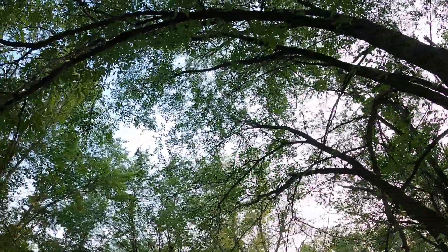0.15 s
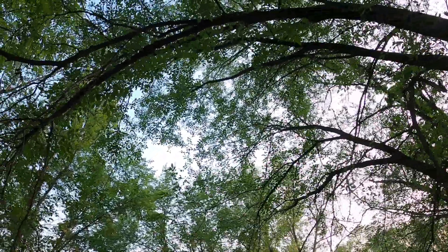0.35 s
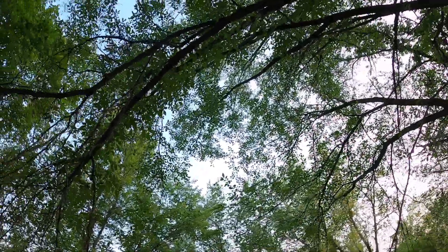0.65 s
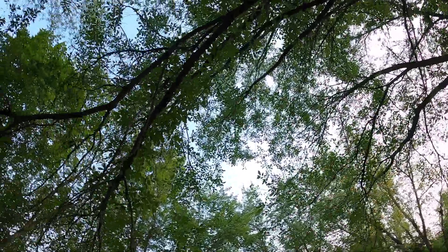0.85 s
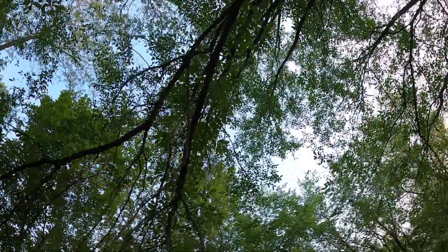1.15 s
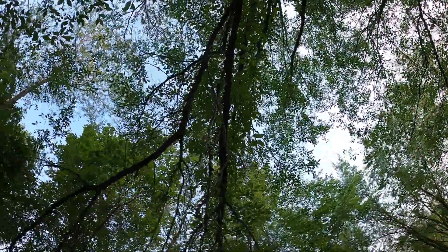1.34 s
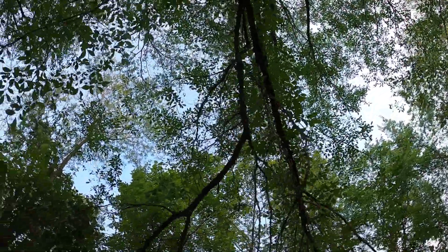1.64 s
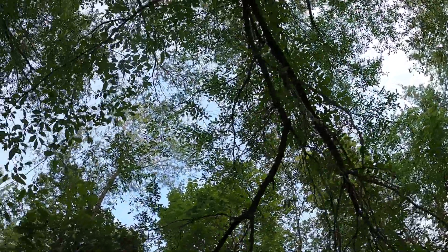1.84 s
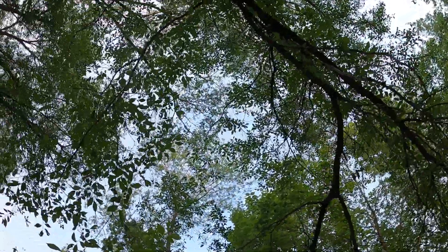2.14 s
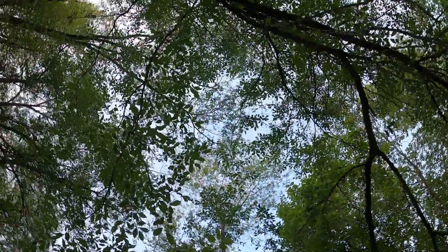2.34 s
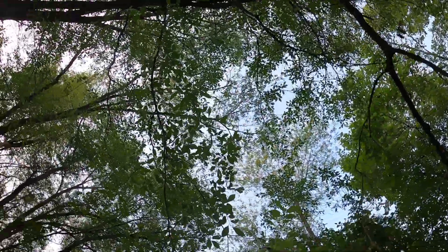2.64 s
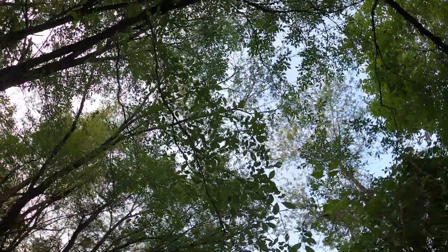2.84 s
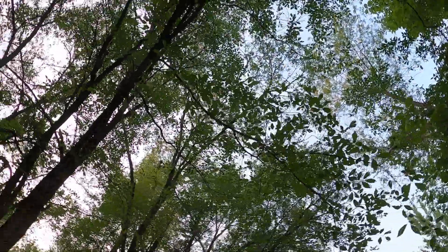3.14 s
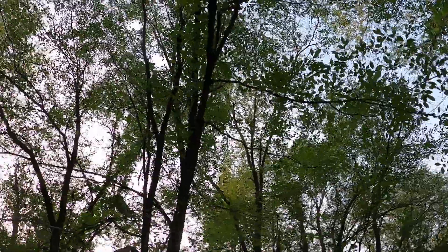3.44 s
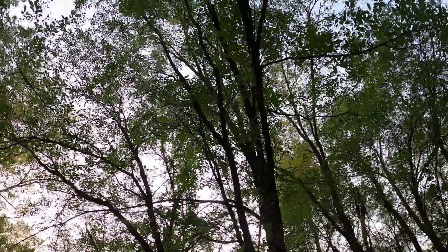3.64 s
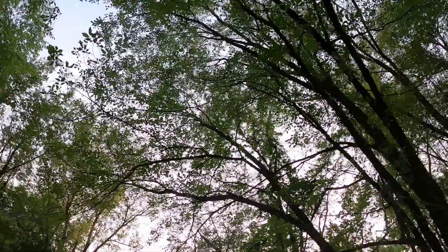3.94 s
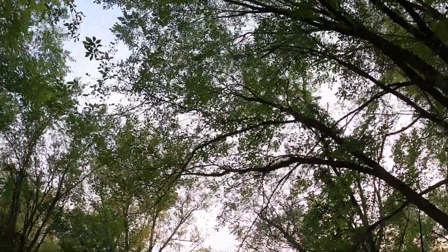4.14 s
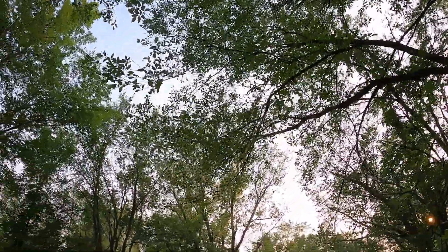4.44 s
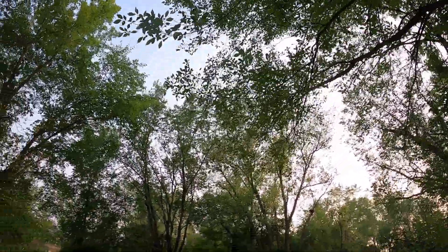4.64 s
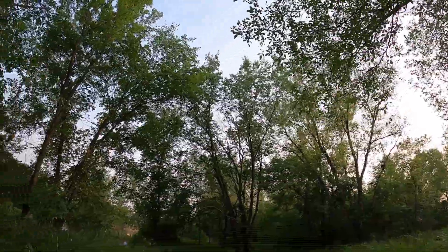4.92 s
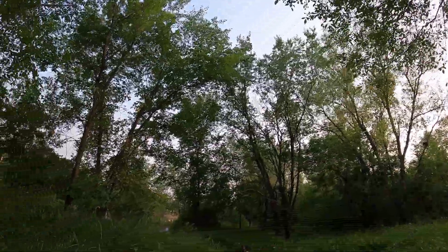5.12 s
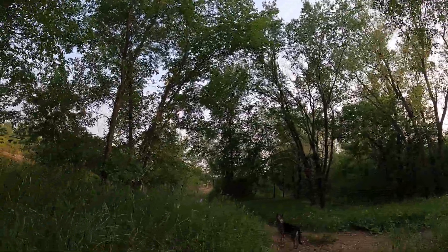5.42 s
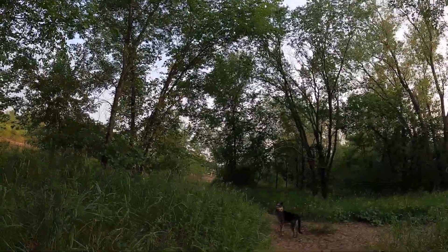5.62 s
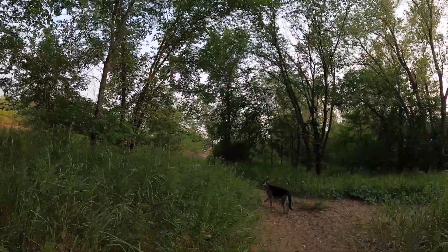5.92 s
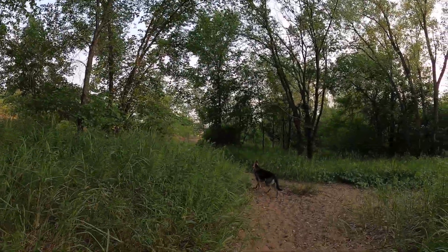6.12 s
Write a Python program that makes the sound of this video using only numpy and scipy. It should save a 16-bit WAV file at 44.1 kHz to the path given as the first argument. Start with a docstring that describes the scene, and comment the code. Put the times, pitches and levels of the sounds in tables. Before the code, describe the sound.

Cicadas shrill steadily over a distant road's rumble and growing engine hum, with clothing swishes, faint litter ticks and two early bird chips.

```python
"""Cicadas shrill from the treetops over the rumble of a distant road and a faint engine hum.
Someone turning slowly rustles and swishes clothing, and dry litter ticks underfoot.
Air buffets the microphone; a small bird chips twice and another twitters far off.
Cicadas are click-driven decaying rings; road, air, cloth and litter are shaped noise;
engine and birds are sines; singing tyres are narrow fluttering bands."""
import sys
import numpy as np
from scipy import signal
from scipy.fft import rfft, irfft
from scipy.io import wavfile
from scipy.ndimage import uniform_filter1d

SR = 44100
rng = np.random.default_rng(int(sys.argv[2]) if len(sys.argv) > 2 else 0)


def wav_record(signal):
    """Record a signal, one row per channel, as 16-bit PCM in the file named by sys.argv[1]."""
    frames = np.transpose(np.atleast_2d(signal))
    bounded = np.clip(frames, -1, 1)
    # unit amplitude maps onto the largest positive 16-bit level
    quanta = np.round(bounded * 32767).astype(np.int16)
    wavfile.write(sys.argv[1], SR, quanta)


N = 276507
TIME = np.arange(N) / SR
FREQ = np.maximum(np.arange(N // 2 + 1) * SR / N, 1)

# Spectrum levels are relative. Bump lengths are 1/e half-widths.
# Distant road spectrum: (frequency [Hz], level [dB])
ROAD_HZ_DB = [(160, 0), (280, -9), (309, -16.5), (382, -2.5), (409, -6.5), (467, -7), (528, -1.5),
              (571, -4.5), (729, -4), (1030, 1), (1260, -3), (2510, -17), (2930, -25), (3500, -29),
              (4000, -37), (5200, -71), (8800, -120)]
# Road over time: (time [s], roar level before flutter [dB], gain of the part below about 800 Hz [dB])
ROAD_S_DB_DB = [(0, -43.5, 2), (.6, -43, 2.8), (1.2, -45, 4.5), (2.2, -45.5, 3), (3.5, -46, 2.5),
                (4.5, -46, 3), (5.4, -44.5, -2), (6.27, -45, -3.5)]
# Tyres singing on the road: (centre [s], length [s], frequency [Hz], level [dB])
WHINE_S_S_HZ_DB = [(3, 4, 531, -60.5), (.1, .3, 535, -57), (1.5, .28, 533, -54.5), (3.12, .1, 526, -56),
                   (3.72, .24, 529, -56), (4.7, .33, 526, -57.5), (2.2, 2.6, 965, -60),
                   (.68, .08, 940, -54.5), (2.75, .3, 945, -56.5), (3.7, .2, 940, -56.5),
                   (5.9, .18, 955, -56), (3, 4, 1055, -61), (.55, .22, 1075, -57.5), (2.3, .2, 1065, -56.5),
                   (4.33, .25, 1045, -53), (5.05, .12, 1050, -56.5), (5.87, .1, 1055, -53),
                   (6.24, .13, 1040, -52.5)]
WHINE_HALF_WIDTH_HZ = 17.3
# Low rumble spectrum: (frequency [Hz], level [dB])
RUMBLE_HZ_DB = [(11, -51), (18, 5), (37, 1.5), (78, -5), (103, -11.5), (150, -16), (330, -31.5), (430, -54),
                (730, -120)]
# Gain of the upper rumble: (time [s], gain [dB])
UPPER_S_DB = [(0, -30), (1.3, -29), (2, -32), (2.9, -31.5), (3.5, -29), (4.7, -28.5), (5.3, -32),
              (6.27, -30.5)]
# Surges of the deep rumble: (centre [s], length [s], added gain [dB])
SURGES_S_S_DB = [(.55, 0.14, -40), (1.15, 0.17, -34.5), (1.6, 0.032, -25), (2.07, 0.055, -35),
                 (3.5, 0.25, -31.5), (4.58, 0.3, -37.5)]
DEEP_DB = -31.5
# Far engine drawing nearer: (time [s], level [dB])
ENGINE_S_DB = [(0, -53), (2.5, -48), (3.5, -42.4), (4.6, -41.4), (4.95, -37.4), (6.27, -35.2)]
ENGINE_FIRING_HZ = 74.35
# Puffs of air on the microphone: (centre [s], length [s], level before port gains [dB])
PUFFS_S_S_DB = [(.28, 0.033, -40), (3.625, 0.12, -31.5), (3.966, 0.029, -40), (4.03, 0.058, -26),
                (4.78, 0.031, -38)]
# Bouts of far twitter: (centre [s], length [s], pitch [Hz], level before canopy and ear gains [dB])
TWITTER_S_S_HZ_DB = [(1.8, .06, 4770, -61), (2.08, .03, 4760, -64), (2.255, .04, 4880, -57),
                     (2.3, .05, 4470, -56), (2.55, .1, 4780, -68), (2.742, 0.082, 4480, -58),
                     (2.85, .07, 4890, -57), (3.16, 0.065, 4440, -55), (3.37, 0.083, 4890, -54.5),
                     (3.938, 0.054, 4510, -57), (4.72, 0.07, 4820, -57)]
# Bird chips: (start [s], length [s], start pitch [Hz], end pitch [Hz], peak before ear gains [dB])
CHIPS_S_S_HZ_HZ_DB = [(0.054, .031, 4570, 4170, -45.5), (0.098, 0.032, 4640, 4170, -46.5)]
CHIP_ARCH, CHIP_ECHO_DB, CHIP_ECHO_S = 1.9, -11, .02
# Rubbing cloth spectrum: (frequency [Hz], level [dB])
CLOTH_HZ_DB = [(4710, -23), (8000, 1), (8270, -18), (8670, -1), (9220, -0.5), (10800, -8), (12200, -5.5),
               (13500, -11.5), (15600, -24)]
# Slow rubs, one per body movement: (start [s], length [s], level before sag and flutter [dB])
RUBS_S_S_DB = [(-.07, 1.48, -58), (1.75, 1.17, -70.5), (3.63, 0.9, -70), (3.96, 0.19, -70),
               (4.61, 0.33, -69), (4.88, 0.26, -62), (5.46, 0.17, -61.5), (6.11, .2, -66)]
RUB_ATTACK_S, RUB_SAG_DB_PER_S, RUB_RELEASE_S, CLOTH_REST_DB = 0.04, 6, 0.094, -79.5
# Sleeve swishes: (peak [s], rise 1/e [s], decay [s], swish gain [dB], body relative to swish gain [dB])
SWISHES_S_S_S_DB_DB = [(.003, .012, .023, -44.5, -2), (0.055, 0.0032, .005, -38, -10),
                       (.132, 0.0035, 0.011, -40, 2.5), (.367, .005, .005, -49, 2),
                       (3.859, .014, 0.015, -54, -5), (3.886, 0.006, .015, -50, 0),
                       (4.893, 0.022, 0.053, -48.5, -2.5), (5.24, .025, .03, -63, -4),
                       (5.513, 0.0086, .016, -43, 1.5), (5.537, 0.014, 0.029, -39, -9)]
# Swish body spectrum: (frequency [Hz], level [dB])
SWISH_HZ_DB = [(2500, -7), (3800, -10.5), (4700, 2.5), (6500, 3.5), (8300, -5), (9200, 7.5), (11000, -14),
               (13000, -25), (16000, -15)]
SWISH_HISS_DB = -6  # hiss relative to the swish gain
# Threads catching and letting go: (time [s], peak level [dB])
SNAGS_S_DB = [(.518, -45), (3.829, -54), (4.022, -58), (4.952, -49), (4.964, -46), (5.063, -48),
              (5.102, -56), (5.491, -52), (5.602, -44.5), (5.619, -50)]
SNAG_DECAY_S = 0.00067
# Crunching litter spectrum: (frequency [Hz], level [dB])
LITTER_HZ_DB = [(900, -37), (2000, 3.5), (3200, -2), (4600, 5.5), (6000, 3), (8000, -5), (12000, -13),
                (16000, -43)]
# Shoe turning on dry litter: (start [s], length [s], level before sag [dB])
SCUFFS_S_S_DB = [(-.03, 0.044, -50), (.2, 0.24, -58), (.42, .07, -51), (.7, 0.91, -62), (3.68, 0.48, -63),
                 (4.82, 0.35, -62), (5.5, 0.39, -61.5), (6.18, .1, -66)]
SCUFF_ATTACK_S, SCUFF_SAG_DB_PER_S, SCUFF_RELEASE_S, LITTER_REST_DB = 0.023, 0.5, 0.19, -75
# Twigs and grit: (time [s], snap level [dB], crumbling tail relative to snap [dB],
# tail decay [s], brightness [dB/octave])
TICKS_S_DB_DB_S_DB_PER_OCT = [(0.362, -48, 3, 0.028, -.5), (0.634, -39, -16, .004, -1),
                              (.663, -48, -12, .003, -1), (1.53, -61, -4, .0068, 4),
                              (1.784, -51.5, -1, 0.01, -5), (2.162, -56, -3, .003, 5),
                              (4.106, -45, -2.5, 0.032, -2), (4.922, -53, -5, .005, -6),
                              (5.767, -52.5, 4, 0.031, -14)]
# Ring modes of a dry twig: (frequency [Hz], level before brightness [dB], decay [s])
TWIG_HZ_DB_S = [(2600, -7, 0.0049), (4370, -3, .003), (5880, 6.5, 0.0031)]
SNAP_DECAY_S = 0.0053
# Cicada body resonance: (frequency [Hz], level [dB])
SHRILL_HZ_DB = [(5200, -22.5), (5700, -16.5), (6000, -15.5), (6300, -8), (6550, -.5), (6750, 0.5),
                (7100, -5), (7400, -13), (7700, -23.5), (8000, -35.5)]
# High chorus swell: (time [s], level before flutter [dB])
CHORUS_S_DB = [(0, -49), (2.2, -49.5), (3, -46.5), (4.6, -49), (5.5, -51), (6.27, -50.5)]
# Spectrum of the lower insects: (frequency [Hz], level [dB])
RASP_HZ_DB = [(3800, -12), (4150, -7), (4400, -0.5), (4700, 3.5), (5000, 0), (5250, -25), (5500, -27)]
# Swell of the lower insects: (time [s], level before flutter [dB])
RASP_S_DB = [(0, -62.5), (4.7, -63), (5.4, -67), (6.27, -64)]
# Lean of the stereo image: (frequency [Hz], left minus right [dB])
TILT_HZ_DB = [(30, -.3), (70, -.5), (140, -1), (300, 0), (1000, 0.7), (2500, 3), (4700, 3.5), (6700, 7),
              (7500, 6.5), (8300, 1.9), (9300, 10), (10800, 7), (12300, 10.9), (15000, 11)]
# Likeness of the two channels, capped at 0.99 in use: (frequency [Hz], correlation [0-1])
LIKENESS_HZ_CORR = [(30, 1), (70, 0.99), (130, 1), (280, 0.95), (550, 0.93), (1100, 0.85), (2500, 0.37),
                    (4700, 0.29), (6700, .03), (12000, 0.042)]
TOP_HZ = 15600


def undb(db):
    """Decibels to gain."""
    return 10 ** (np.asarray(db) / 20)


def unit(x):
    """Scale to an rms of one."""
    return x / np.sqrt(np.mean(x ** 2) + 1e-30)


def curve(rows):
    """Gain over time from (time [s], level [dB]) rows."""
    return undb(np.interp(TIME, *np.transpose(rows)))


def across(points):
    """(frequency [Hz], value) points joined on a log-frequency axis."""
    hz, value = np.transpose(points)
    return np.interp(np.log(FREQ), np.log(hz), value)


def colour(x, points):
    """Filter by a (frequency [Hz], level [dB]) spectrum, falling steeply beyond its ends; unit rms."""
    octaves_below = np.maximum(np.log2(points[0][0] / FREQ), 0)
    octaves_above = np.maximum(np.log2(FREQ / points[-1][0]), 0)
    gain = undb(across(points) - 49 * (octaves_below + octaves_above))
    return unit(irfft(rfft(x) * gain, N))


def noise():
    """Two unrelated white noises."""
    return rng.standard_normal((2, N))


def walk(rate_hz):
    """Smooth random wandering with a spread of one."""
    return unit(irfft(rfft(rng.standard_normal(N)) * np.exp(-(FREQ / rate_hz) ** 2), N))


def bump(at_s, length_s):
    """Gaussian swell around one moment."""
    return np.exp(-((TIME - at_s) / length_s) ** 2)


def swells(rows):
    """Summed gain of bumps: (centre [s], length [s], level [dB])."""
    return sum(undb(db) * bump(at, length) for at, length, db in rows)


def strokes(rows, attack_s, sag_db_per_s, release_s, rest_db):
    """Gain of rubbing strokes: attack, sagging hold and release, power-summed over a resting level."""
    power = undb(rest_db) ** 2
    for at, length, db in rows:
        age = np.maximum(TIME - at, 0)
        attack = np.minimum(age / attack_s, 1)
        release = np.exp(-np.maximum(age - length, 0) / release_s)
        power = power + (attack * release * undb(db - sag_db_per_s * age)) ** 2
    return np.sqrt(power)


def even(pair):
    """Level out the broad shape of a spectrum and keep its fine grain."""
    spectrum = rfft(pair)
    power = uniform_filter1d(np.mean(np.abs(spectrum) ** 2, axis=0), size=1200)
    return irfft(spectrum / np.sqrt(np.abs(power) + 1e-6 * power.max()), N)


def ports(pair):
    """Left and right from two unrelated signals: alike in the bass, leaning left in the treble."""
    alike = np.clip(across(LIKENESS_HZ_CORR), -.99, .99)
    mid, side = rfft(pair) * np.sqrt([1 + alike, 1 - alike])
    lean = undb(across(TILT_HZ_DB) / 2)
    out = irfft(np.array([(mid + side) * lean, (mid - side) / lean]), N)
    return out / np.std(out.mean(axis=0))


def scatter_paths(fade_s):
    """Decaying noise responses of leaves and branches, different for each ear."""
    tail = TIME[:SR // 4]
    return unit(rng.standard_normal((2, len(tail))) * np.exp(-tail / fade_s)) / np.sqrt(len(tail))


def canopy(x, fade_s):
    """Leaves and branches scatter a sound into a short tail."""
    return signal.fftconvolve(scatter_paths(fade_s), x[None], axes=1)[:, :N]


def road():
    """Far traffic: a coloured-noise tyre roar that loses its body toward the end."""
    roar = ports(colour(noise(), ROAD_HZ_DB))
    body = irfft(rfft(roar) / (1 + (FREQ / 800) ** 6), N)
    times, roar_db, body_db = np.transpose(ROAD_S_DB_DB)
    weighted = roar + body * (undb(np.interp(TIME, times, body_db)) - 1)
    return weighted * undb(np.interp(TIME, times, roar_db) + 0.79 * walk(5.9))


def whine():
    """Passing tyres sing in narrow, fluttering bands that swell and fade."""
    flutter = walk(WHINE_HALF_WIDTH_HZ) + 1j * walk(WHINE_HALF_WIDTH_HZ)
    out = np.zeros(N)
    for at, length, hz, db in WHINE_S_S_HZ_DB:
        carrier = np.exp(2j * np.pi * hz * TIME)
        band = np.real(np.roll(flutter, rng.integers(N)) * carrier)
        out += undb(db) * bump(at, length) * band
    return out


def rumble():
    """A low noise rumble whose deepest part surges."""
    low = ports(colour(noise(), RUMBLE_HZ_DB))
    deep = irfft(rfft(low) / (1 + (FREQ / 75) ** 4), N)
    return deep * (undb(DEEP_DB) + swells(SURGES_S_S_DB)) + (low - deep) * curve(UPPER_S_DB)


def engine():
    """Firing rate and second harmonic of a far engine, fading in and out on the way through the trees."""
    turn = 2 * np.pi * np.cumsum(ENGINE_FIRING_HZ * (1 + 0.01311 * walk(4.27))) / SR
    fading = undb(3 * walk(9))
    hum = np.sin(turn) + undb(-16.5) * np.sin(2 * turn)
    return unit(hum * fading) * curve(ENGINE_S_DB)


def buffets():
    """Air tumbles over the microphone as low noise, mostly on the right port."""
    eddies = colour(noise(), [(40, -8.5), (90, -2), (160, -4.0), (260, -21.5), (400, -36.0)])
    left = undb(-17) * (eddies[1] + 0.5 * eddies[0])
    right = undb(7.5) * eddies[1]
    return np.array([left, right]) * swells(PUFFS_S_S_DB)


def twitter():
    """A far bird repeats quick falling sine notes, blurred by the trees."""
    out = np.zeros(N)
    for at, length, hz, db in TWITTER_S_S_HZ_DB:
        note = np.cumsum(26 * (1 + 0.18 * walk(22))) / SR % 1  # phase at about 26 notes/s
        pitch_hz = hz * (1 + 0.0867 * (.5 - note) + .022 * walk(122.2))
        whistle = np.sin(2 * np.pi * np.cumsum(pitch_hz) / SR)
        out += undb(db) * bump(at, length) * np.sin(np.pi * note) ** 2 * whistle
    return canopy(out, fade_s=0.03) * undb([[8], [6]])


def bird():
    """Short sine whistles from the right: each starts level, then drops, and the leaves blur it."""
    out = np.zeros(N)
    for at, length, start_hz, end_hz, db in CHIPS_S_S_HZ_HZ_DB:
        part = np.clip((TIME - at) / length, 0, 1)
        hz = start_hz + (end_hz - start_hz) * part ** CHIP_ARCH + 60 * walk(400)
        out += undb(db) * np.sin(np.pi * part) * np.sin(2 * np.pi * np.cumsum(hz) / SR)
    return (out + undb(CHIP_ECHO_DB) * canopy(out, CHIP_ECHO_S)) * undb([[-1], [4]])


def clothing():
    """Threads slip in a grainy hiss; quick arm moves swish and trail off; a few threads snap free."""
    hiss = ports(colour(noise() * undb(2.0 * walk(500)), CLOTH_HZ_DB))
    body = ports(colour(noise() * undb(3.1 * walk(350)), SWISH_HZ_DB))
    rubbing = strokes(RUBS_S_S_DB, RUB_ATTACK_S, RUB_SAG_DB_PER_S, RUB_RELEASE_S, CLOTH_REST_DB)
    rubbing = rubbing * undb(1.4 * walk(22))  # uneven pressure
    swishing, pressing, snags = 0, 0, 0
    for at, rise, decay, db, body_db in SWISHES_S_S_S_DB_DB:
        fall = np.exp(-np.abs(TIME - at) / decay)
        swish = undb(db) * np.where(TIME < at, bump(at, rise), fall)
        swishing = swishing + swish
        pressing = pressing + undb(body_db) * swish
    for at, db in SNAGS_S_DB:
        fall = np.exp(-np.clip((TIME - at) / SNAG_DECAY_S, 0, 20))
        snags = snags + undb(db) * (TIME >= at) * fall
    return hiss * (np.hypot(rubbing, undb(SWISH_HISS_DB) * swishing) + snags) + body * pressing


def scuffing():
    """Dry litter crunches as grainy noise under a turning shoe."""
    crunch = ports(colour(noise() * undb(1.9 * walk(690)), LITTER_HZ_DB))
    return crunch * strokes(SCUFFS_S_S_DB, SCUFF_ATTACK_S, SCUFF_SAG_DB_PER_S,
                            SCUFF_RELEASE_S, LITTER_REST_DB)


def twigs():
    """Twigs snap as noise, ring briefly in a few modes and crumble."""
    out = np.zeros((2, N))
    crumbs = unit(undb(2.2 * walk(300)))
    grit = rfft(ports(colour(noise(), LITTER_HZ_DB)))
    pivot_hz = TWIG_HZ_DB_S[0][0]
    for at, db, tail_db, decay, bright in TICKS_S_DB_DB_S_DB_PER_OCT:
        age = np.clip(TIME - at, 0, 20 * decay)
        tail = undb(tail_db) * crumbs * np.exp(-age / decay)
        shape = np.hypot(np.exp(-age / SNAP_DECAY_S), tail)
        crack = irfft(grit * undb(bright * np.log2(FREQ / pivot_hz)), N)
        crack = shape * crack / np.std(crack.mean(axis=0))
        size = 1 + 0.013 * rng.standard_normal()  # scales every mode
        ring = 0
        for hz, mode_db, fade in TWIG_HZ_DB_S:
            gain = undb(mode_db + bright * np.log2(hz / pivot_hz))
            ring = ring + gain * np.sin(2 * np.pi * hz * size * age) * np.exp(-age / fade)
        out += (crack + ring) * undb(db) * (TIME >= at)
    return out


def singers(ring_hz, click_hz, beat_hz, glide, spread, throb_db, canopy_s, count):
    """Each insect clicks its tymbals in beats; the ring sinks through a beat and leaves scatter it."""
    out = np.zeros((2, N))
    for _ in range(count):
        pace, pitch, size = rng.standard_normal(3)
        beat = np.cumsum(beat_hz * (1 + .05 * pace + .04 * walk(5))) / SR % 1
        rate_hz = click_hz * (1 + .1 * pace + .05 * walk(60))
        age = np.cumsum(rate_hz) / SR % 1 / rate_hz  # time since the last click
        hz = ring_hz * (1 + spread * pitch + glide * (.5 - beat))
        ring = np.sin(2 * np.pi * hz * age) * np.exp(-age / 0.0023)
        song = ring * undb(throb_db * np.cos(2 * np.pi * beat) + 2 * size + walk(2.3))
        paths = scatter_paths(canopy_s)
        paths[[0, 1], rng.integers(0, 24, size=2)] += 1.2  # the direct sound
        out += signal.fftconvolve(paths, song[None], axes=1)[:, :N]
    return out


def cicadas():
    """A high chorus that flutters as it reaches the ear, and a weaker, lower one."""
    high = singers(ring_hz=6743, click_hz=424.0, beat_hz=39.94, glide=0.091, spread=0.0423,
                   throb_db=4.5, canopy_s=0.054, count=6)
    low = singers(ring_hz=4615, click_hz=248.9, beat_hz=28.56, glide=0.046, spread=0.0735,
                  throb_db=4.5, canopy_s=0.078, count=4)
    high = ports(colour(even(high), SHRILL_HZ_DB)) * curve(CHORUS_S_DB) * undb(0.7 * walk(30))
    low = ports(colour(even(low), RASP_HZ_DB)) * curve(RASP_S_DB) * undb(2.2 * walk(4.2))
    return high + low


def scene():
    """Everything heard under the trees."""
    background = road() + whine() + rumble() + engine() + buffets()
    near = clothing() + scuffing() + twigs()
    return background + twitter() + bird() + near + cicadas()


def record(dry):
    """Fade 3 ms in and out, then cut the top with a steep low-pass."""
    ease = np.clip(np.minimum(TIME, TIME[-1] - TIME) / .003, 0, 1)
    low_pass = signal.ellip(10, .1, 80, TOP_HZ, fs=SR, output="sos")
    return signal.sosfilt(low_pass, dry * ease)


dry = scene()
out = record(dry)
wav_record(out)
```